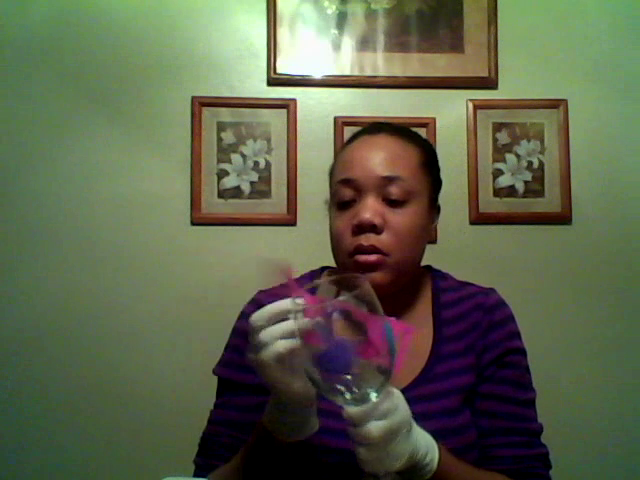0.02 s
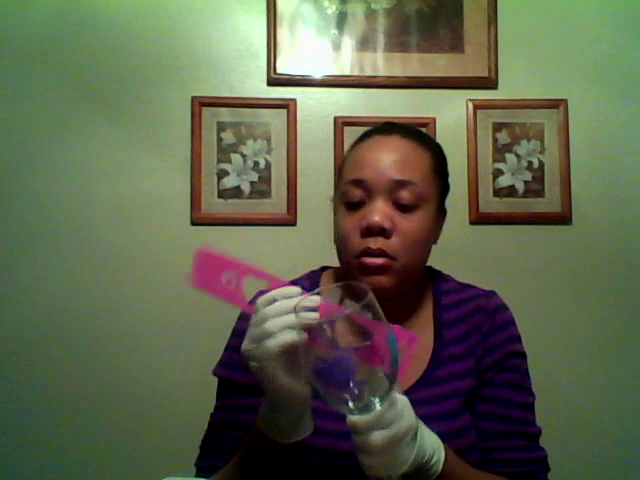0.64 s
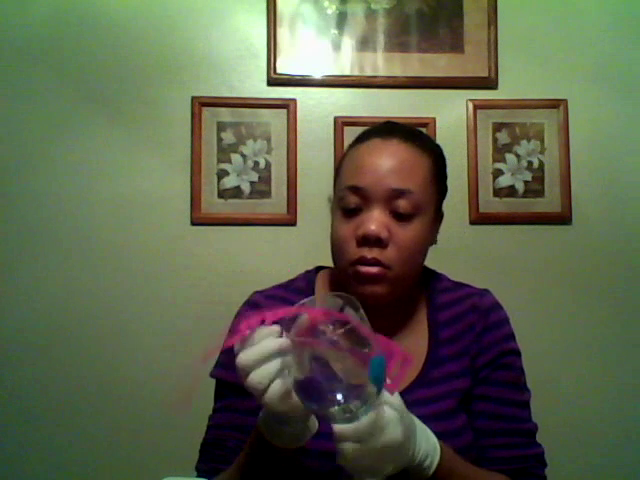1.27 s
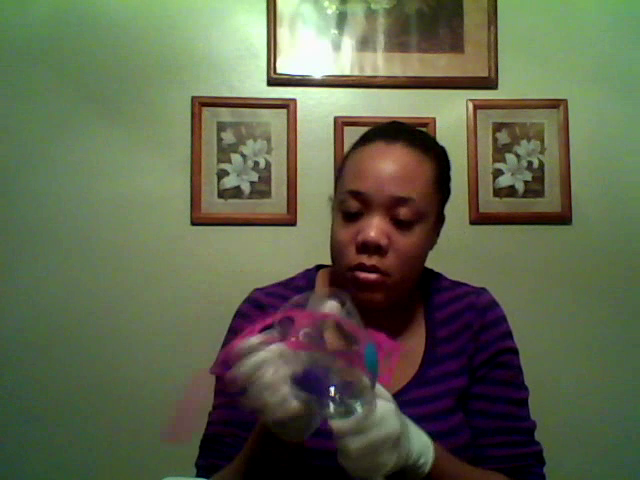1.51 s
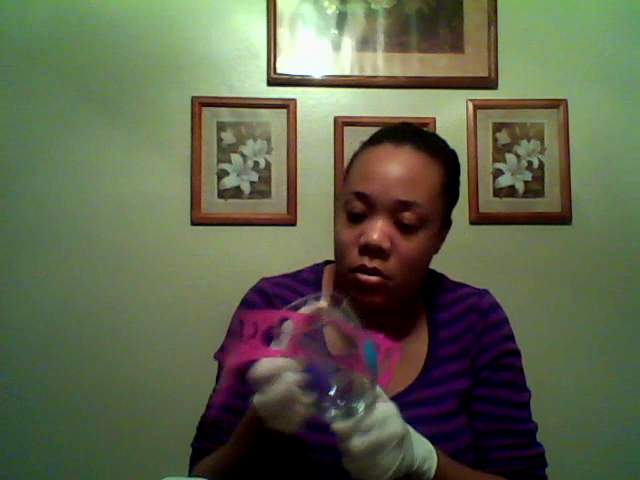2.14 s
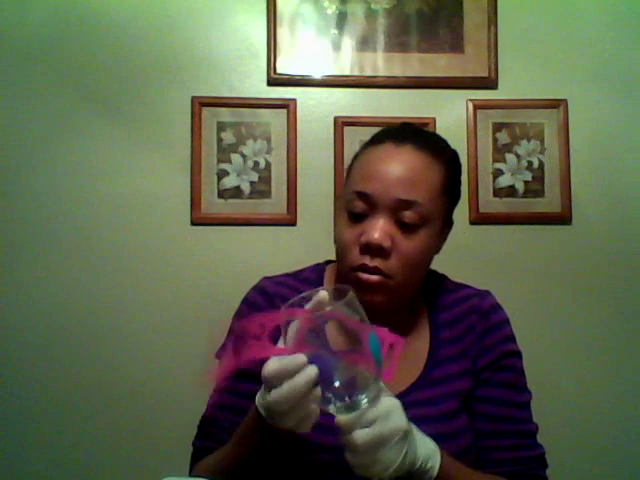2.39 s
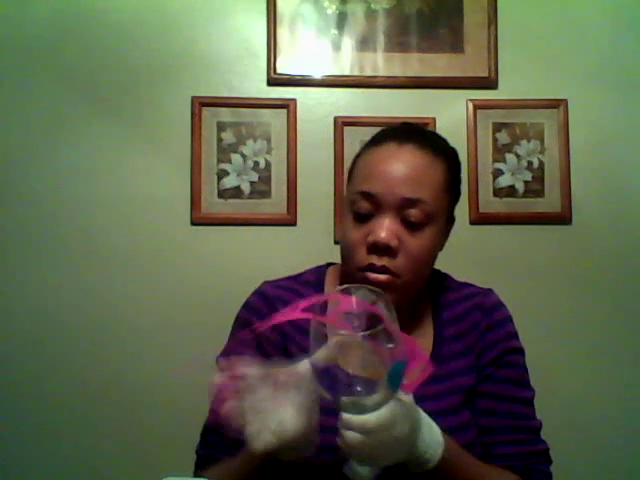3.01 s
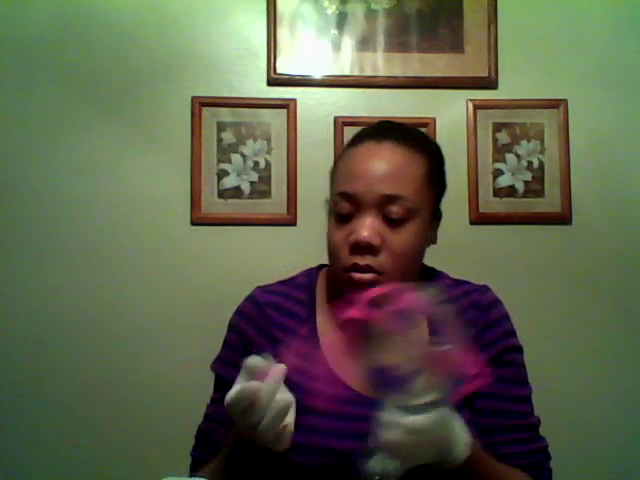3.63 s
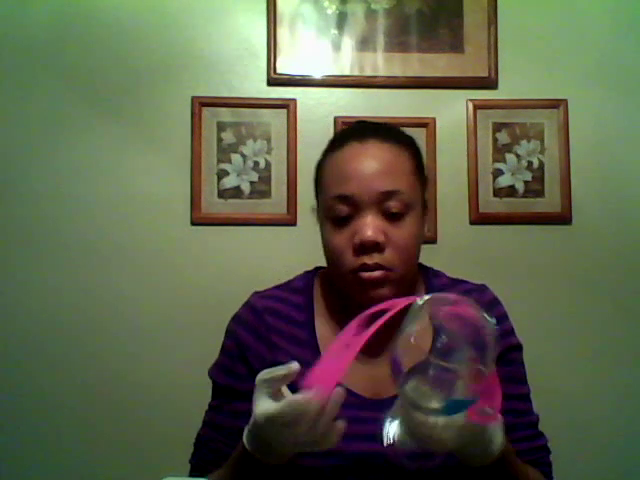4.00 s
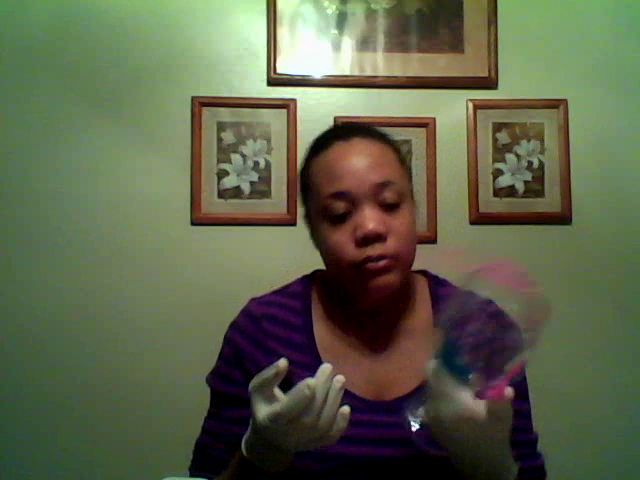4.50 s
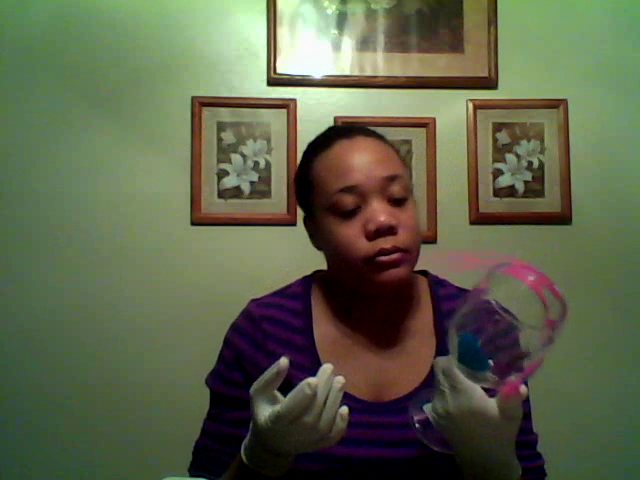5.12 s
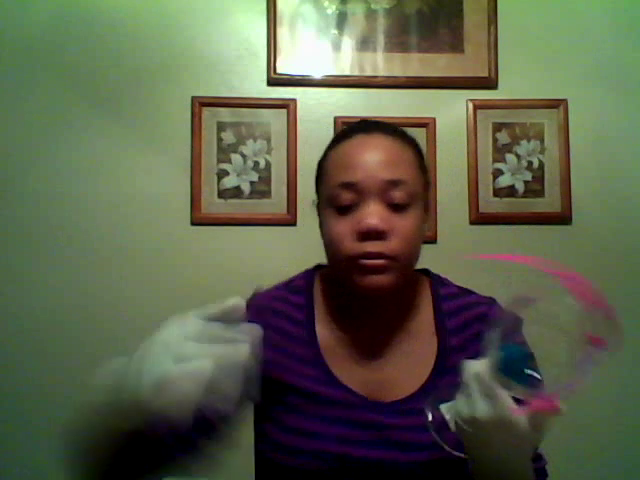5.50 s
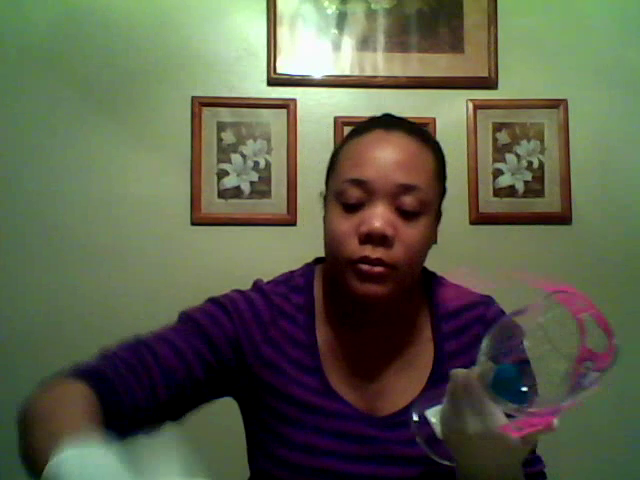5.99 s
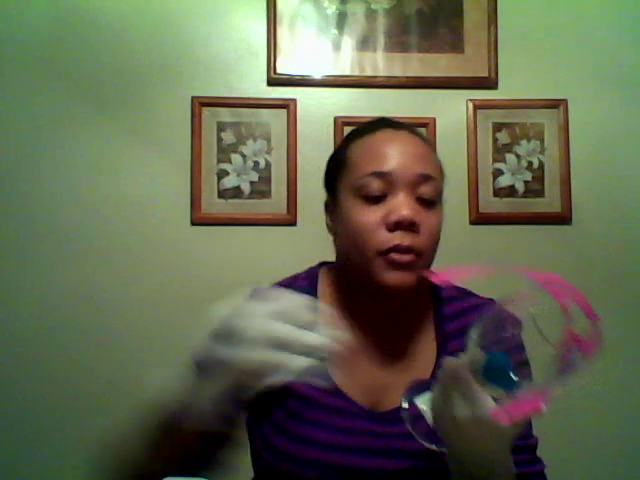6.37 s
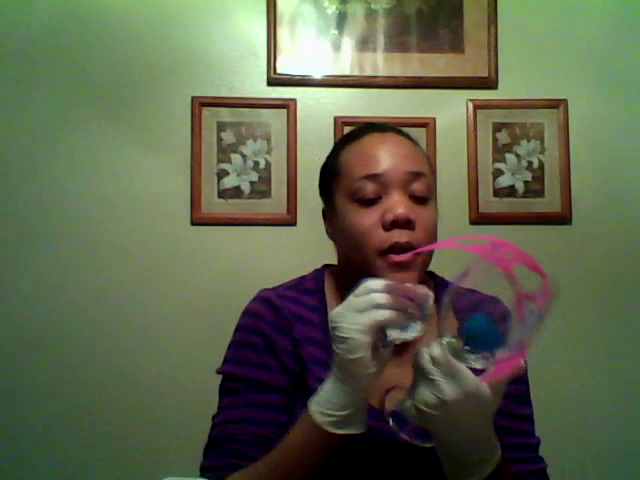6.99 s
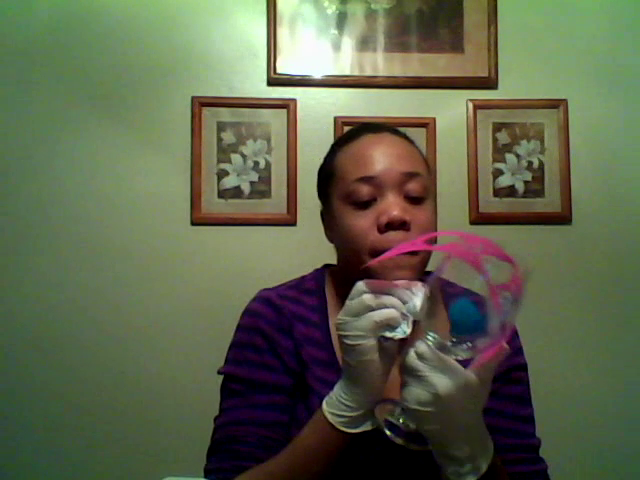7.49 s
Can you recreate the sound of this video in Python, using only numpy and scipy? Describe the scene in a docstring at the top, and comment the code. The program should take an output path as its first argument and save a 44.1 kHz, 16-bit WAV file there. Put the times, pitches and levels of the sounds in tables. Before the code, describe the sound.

Light plastic clicks and brief clinks on a handled wine glass, then a short scrape and squeak, over a low hum.

```python
"""Plastic sheet on a wine glass

Gloved hands turn a wine glass and press a thin plastic sheet onto it, close to a computer microphone.
The sheet snaps and scuffs against the bowl, which rings briefly under the grip; the gloves tick and the
hands bump. One hand slides something off the table and squeaks on it by stick-slip.
The computer's disk and fan hum in a small room."""
import sys
import numpy as np
from scipy import signal
from scipy.fft import rfft, irfft
from scipy.io import wavfile
from scipy.ndimage import uniform_filter1d

SR = 44100
rng = np.random.default_rng(int(sys.argv[2]) if len(sys.argv) > 2 else 0)


def master_out(mix):
    """Clip the mix to full scale and print it as 16-bit PCM to the path in sys.argv[1]."""
    frames = np.transpose(np.atleast_2d(mix))
    ceiling = np.clip(frames, -1, 1)
    pcm = np.round(ceiling * 32767).astype(np.int16)
    wavfile.write(sys.argv[1], SR, pcm)


N = 343539
TIME = np.arange(N) / SR
MS = 1e-3
# Edges in Hz of the four contact-noise bands: body, mid, edge, sheen.
CONTACT_EDGES_HZ = [300, 1400, 2800, 5000, 7600]


def undb(db):
    """Decibels to gain."""
    return 10 ** (np.asarray(db) / 20)


def unit(x):
    """Scale to unit energy."""
    return x / np.sqrt(np.sum(x ** 2))


def band(x, lo_hz, hi_hz, order=3):
    """Causal band-pass."""
    return signal.sosfilt(signal.butter(order, [lo_hz, hi_hz], "band", fs=SR, output="sos"), x)


def resonate(x, hz, width_hz):
    """Broad resonance, unity gain at centre."""
    return signal.lfilter(*signal.iirpeak(hz, hz / width_hz, fs=SR), x)


def add(out, start_s, x):
    """Mix x into out from start_s."""
    i = int(start_s * SR)
    out[i:i + len(x)] += x[:N - i]


def drift(rate_hz):
    """Smooth random drift, spread near one."""
    hold = int(SR / rate_hz)
    return uniform_filter1d(np.repeat(rng.standard_normal(N // hold + 1), hold), hold)[:N]


def room(x, early_db=-11, early_t60_s=0.079, late_db=-20, late_t60_s=0.29, gap_ms=4, path_spread=0.14):
    """Direct sound, near reflections and a short tail; paths differ per call, as the hands move."""
    # Table, screen and wall. Each row: delay in ms, gain in dB.
    reflections = [(2.3, -22.5), (6.1, -21.5), (9.2, -12), (11.4, -23.5)]
    t = TIME[:SR // 4]
    response = np.zeros(len(t))
    response[0] = 1
    for delay_ms, db in reflections:
        response[int(delay_ms * MS * SR * (1 + path_spread * rng.uniform(-1, 1)))] += undb(db)
    scatter, tail = rng.standard_normal((2, len(t))) * (t > gap_ms * MS)
    response += undb(early_db) * unit(scatter * np.exp(-np.log(1000) * t / early_t60_s))
    late = undb(late_db) * unit(tail * np.exp(-np.log(1000) * t / late_t60_s))
    response += band(late, 100, 3700, order=1)  # furnishings absorb treble
    return signal.fftconvolve(x, response)[:len(x)]


def computer_hum(disk_waver_db=0.47, fan_waver_db=2, fan_drift=.002):
    """Steady mains and disk tones, slightly wandering fan tones and a soft rush of air."""
    # Mains, disk spindle and fan. Each row: frequency in Hz, rms level in dB.
    tones = [(59.3, -69.5), (90.0, -53), (165.2, -84), (235.4, -74.5), (330.3, -73), (371, -89.5),
             (495.4, -85), (660.6, -75.5), (701.5, -82.5), (826, -83), (1156.4, -84)]
    # Fan air and room rumble. Each row: frequency in Hz, density in dB per Hz.
    air_spectrum = [(10, -91), (25, -77.5), (48, -85), (110, -89.5), (200, -94.5), (400, -99), (750, -95.5),
                    (1200, -103), (2400, -111), (4000, -115), (6500, -121), (7600, -129), (8600, -141)]
    out, fan_speed = np.zeros(N), 1 + fan_drift * drift(3)
    for hz, db in tones:
        is_fan = hz > 120
        clock_s = np.cumsum(fan_speed) / SR if is_fan else TIME
        waver_db = (fan_waver_db if is_fan else disk_waver_db) * drift(4.6)
        out += np.sqrt(2) * undb(db + waver_db) * np.sin(2 * np.pi * (hz * clock_s + rng.random()))
    air_hz, air_db = np.transpose(air_spectrum)
    bins_hz = np.maximum(np.fft.rfftfreq(N, 1 / SR), 1)
    colour = undb(np.interp(np.log(bins_hz), np.log(air_hz), air_db))
    return out + np.sqrt(SR / 2) * irfft(rfft(rng.standard_normal(N)) * colour, N)


def contact_levels(level_db, ping_hz, slope_db_oct, roll_off_db_oct=10.5):
    """Band levels in dB, sloped below the ping; a contact is too slow to excite much above it."""
    edges_hz = np.array(CONTACT_EDGES_HZ)
    octaves = np.log2(np.sqrt(edges_hz[:-1] * edges_hz[1:]) / ping_hz)
    return level_db + slope_db_oct * np.minimum(octaves, 0) - roll_off_db_oct * np.maximum(octaves, 0)


def sheet_response(force, levels_db, length_s, knock_hz, ping_hz, knock_db=10, ping_db=6):
    """The bent sheet rings at two pitches set by the grip; band levels are rms over length_s."""
    knock = undb(knock_db) * resonate(force, knock_hz, width_hz=260)
    ping = undb(ping_db) * resonate(force, ping_hz, width_hz=500)
    hollow = undb(0.5) * resonate(force, hz=566, width_hz=160)  # cavity between hand and bowl
    sound = room(force + knock + ping + hollow)
    bands = zip(CONTACT_EDGES_HZ, CONTACT_EDGES_HZ[1:], levels_db)
    return np.sqrt(length_s * SR) * sum(undb(db) * unit(band(sound, lo, hi)) for lo, hi, db in bands)


def sheet_snaps(rise_ms=.7, lead_in_db=-25, lead_in_ms=1.6, offset_s=.005, length_s=.02):
    """The sheet snaps against the glass; each snap has a faint, brief swell of noise before its crack."""
    # Each row: time in seconds, level at the ping in dB, ping in Hz, slope below it in dB per octave,
    # decay in ms, knock in Hz.
    snaps = [(0.037, -32, 7300, 3.5, 1.45, 2160), (.116, -49, 1970, 8, 1.1, 1800),
             (0.1373, -49, 2110, 4.5, 1.7, 1900), (0.3031, -41, 3880, 1, 2.2, 2140),
             (.3574, -58.5, 3470, -1, 1.06, 750), (0.6, -72, 5730, -2.5, 0.77, 680),
             (0.6889, -51.5, 6780, 11, 1.1, 1320), (.6955, -54.5, 5500, 6, 7.3, 1810),
             (0.7288, -64, 3640, 5, 1.3, 740), (1.392, -42, 6750, 26, 1.7, 730),
             (1.396, -49, 3300, 6, 1.5, 2500), (1.4081, -41.5, 6300, 3.5, 0.7, 1080),
             (1.456, -57.5, 2700, 1.5, 3.9, 754), (1.5565, -65, 2900, 4, 1.3, 1910),
             (1.5798, -37, 7100, 7.5, 1.1, 2290), (1.679, -42, 2300, 2.5, 4.6, 2010),
             (2.3027, -47, 3250, 7, 2.3, 1876), (2.5107, -49, 1750, 2.5, 1.9, 580),
             (2.8355, -45, 6700, 6, 0.65, 1100), (2.8405, -34, 6000, 12.5, 1.8, 1148),
             (3.2345, -61.5, 3240, 0, 2.6, 1320), (4.2629, -39.5, 5680, 6, 2.46, 1930),
             (5.4907, -46.5, 4130, 5.5, 1.04, 1340), (5.793, -44, 1000, 1.5, 2, 530),
             (5.8847, -46, 6200, 0.25, 0.62, 1100), (6.0048, -41, 6250, 2.5, 4.4, 1000),
             (6.1647, -51.5, 2000, 8, 3.7, 2120), (6.532, -62, 6500, 18, 0.56, 726)]
    out, t = np.zeros(N), TIME[:SR // 4] - offset_s
    after_s = np.maximum(t, 0)
    for start_s, level_db, ping_hz, slope_db_oct, decay_ms, knock_hz in snaps:
        levels_db = contact_levels(level_db, ping_hz, slope_db_oct)
        snap = (1 - np.exp(-after_s / (rise_ms * MS))) * np.exp(-after_s / (decay_ms * MS))
        lead_in = undb(lead_in_db) * np.exp(-abs(t) / (lead_in_ms * MS))
        force = (snap + lead_in + 1e-12) * rng.standard_normal(len(t))
        add(out, start_s - offset_s, sheet_response(force, levels_db, length_s, knock_hz, ping_hz))
    return out


def glass_ring(rise_s=0.0051):
    """The contact point favours some bowl modes; a close pair beats, and the grip shortens the ring."""
    # Each row: frequency in Hz, relative level in dB, free t60 in seconds.
    modes = [(763.5, -7, .31), (1847, -21, .75), (1855, -21, .75), (3463, -4, .32), (5324, -2, .27),
             (7300, -15.5, .12)]
    # Each row: start in seconds, level in dB, most excited frequency in Hz, fall either side in dB per
    # octave, share of t60 left by the grip.
    hits = [(.039, -37.5, 764, 12.5, 0.9), (.117, -62, 5324, 7, 1), (.305, -33, 3462, -2.5, 0.5),
            (.696, -43.5, 5324, 27, 0.32), (4.264, -43, 3480, 25, 0.42)]
    out, t = np.zeros(N), TIME[:SR]
    for start_s, hit_db, centre_hz, fall_db_oct, t60_share in hits:
        for hz, mode_db, t60_s in modes:
            gain = undb(hit_db + mode_db - fall_db_oct * abs(np.log2(hz / centre_hz)))
            envelope = (1 - np.exp(-t / rise_s)) * np.exp(-np.log(1000) * t / (t60_s * t60_share))
            add(out, start_s, gain * envelope * np.sin(2 * np.pi * hz * t))
    return out


def hand_bumps(knock_decay_s=0.0079, knock_length_s=.02, shudder_s=0.11):
    """The soft mass of a hand knocks dully on glass or table, and the table shudders after it."""
    # Each row: start in seconds, knock level in dB, shudder level in dB.
    bumps = [(.039, -48, -58), (.304, -51, -52), (1.409, -61, -84), (1.681, -51, -73), (2.512, -54, -73),
             (5.767, -57, -56.5), (5.795, -51.5, -57.5), (6.004, -51, -54), (6.165, -53.5, -65.5)]
    out, t = np.zeros(N), TIME[:SR // 3]
    for start_s, knock_db, shudder_db in bumps:
        push, sway = rng.standard_normal((2, len(t)))
        knock = unit(band(np.exp(-t / knock_decay_s) * push, 100, 480, order=2))
        shudder = unit(band(np.exp(-t / shudder_s) * sway, 22, 95, order=2))
        add(out, start_s, np.sqrt(knock_length_s * SR) * undb(knock_db) * knock)
        add(out, start_s, np.sqrt(shudder_s * SR) * undb(shudder_db) * shudder)
    return room(out)


def slip_grains(count, spread_db=4, grain_samples=16):
    """Tiny slips: noise in grains of unequal size."""
    noise, sizes = rng.standard_normal((count, 2)).T
    return noise * undb(spread_db * np.repeat(sizes[::grain_samples], grain_samples)[:count])


def scuffs(swell_ms=10.33, onset_db=-22, release_db=-20, lift_s=0.0091, knock_hz=1000):
    """Glove and plastic slide in dense stick-slip grains; the pressure swells and lets go."""
    # Each row: start in seconds, fade in ms, level at the ping in dB, ping in Hz, slope below it in dB
    # per octave.
    strokes = [(.046, 44, -54, 2450, -2.5), (.16, 310, -73.5, 2400, 5), (.304, 14, -41, 6340, 23),
               (.32, 12, -52, 5000, -0.5), (.732, 25, -66, 2500, 2), (1.362, 40, -46, 7010, 15.5),
               (1.408, 16, -53, 1830, 3), (2.471, 100, -72, 2500, 3), (2.823, 3.5, -57.5, 6960, -1.5),
               (3.212, 110, -75, 6000, 11), (5.667, 103, -48, 5620, 2.5), (5.693, 89, -40, 5640, 5),
               (5.759, 51, -50.5, 2080, 1.5), (5.98, 20, -47.5, 5060, 4), (6, 24, -51, 2900, -0.5),
               (6.127, 32, -57, 2100, 6.5), (6.154, 42, -62.5, 6400, 20), (6.19, 97, -75, 3400, -1),
               (6.29, 380, -80, 5000, 1)]
    out, t = np.zeros(N), TIME[:SR // 3]
    for start_s, fade_ms, level_db, ping_hz, slope_db_oct in strokes:
        levels_db = contact_levels(level_db, ping_hz, slope_db_oct)
        length_s = (swell_ms + fade_ms) * MS
        pressure = undb(np.interp(t, [0, swell_ms * MS, length_s], [onset_db, 0, release_db]))
        lift_off = np.exp(-np.maximum(t - length_s, 0) / lift_s) + 1e-12
        force = pressure * lift_off * slip_grains(len(t))
        # a sliding finger damps the ping
        scuff = sheet_response(force, levels_db, length_s, knock_hz, ping_hz, knock_db=6, ping_db=-12.5)
        add(out, start_s, scuff)
    return out


def glove_ticks(stray_db=-54, spread_db=3, accent_db=7, crackle_db=-3, crackle_ms=2.5):
    """Gloves tick as the fingers flex: a few distinct ticks among stray ones, each with a tiny crackle."""
    # Each row: time in seconds, stray ticks per second (none at or below zero).
    finger_activity = [(0, 22), (1, 7), (2.1, 16), (3.3, 11), (3.8, 0), (5.9, -3), (6.4, 8), (7.8, 2)]
    # Each row: time in seconds, relative level in dB.
    distinct_ticks = [(0.5132, -47), (0.7721, -43.5), (1.2526, -46), (1.4845, -35.5), (2.0268, -48),
                      (2.9517, -39.5), (6.6677, -46.5), (7.014, -47)]
    rate_hz = np.interp(TIME, *np.transpose(finger_activity))
    ticks = (rng.random(N) < rate_hz / SR) * undb(stray_db + spread_db * rng.standard_normal(N))
    for start_s, db in distinct_ticks:
        ticks[int(start_s * SR)] += undb(db + accent_db)
    t = TIME[:SR // 30]
    crackle = undb(crackle_db) * unit(np.exp(-t / (crackle_ms * MS)) * rng.standard_normal(len(t)))
    ticks += signal.fftconvolve(ticks, crackle)[:N]
    return room(band(ticks, 1500, 6600, order=4))


def glove_squeak(grip_waver_db=4.5, jitter=.05, rough_db=-2):
    """The glove sticks and slips almost regularly for a moment, under an uneven grip."""
    # Each row: time in seconds, slip rate in Hz, level in dB.
    contour = [(6.056, 730, -66), (6.061, 750, -44.5), (6.072, 795, -43.5), (6.08, 810, -44),
               (6.089, 785, -44.5), (6.096, 740, -51), (6.103, 720, -70)]
    # Each row: centre in Hz, width in Hz, gain in dB.
    resonances = [(790, 430, -8.5), (1650, 440, -11), (2180, 490, 1.5), (3150, 200, -11.5),
                  (5860, 590, -14), (6800, 270, -15)]
    times_s, slip_hz, level_db = np.transpose(contour)
    active = (TIME > times_s[0]) & (TIME < times_s[-1])
    out, t = np.zeros(N), TIME[active]
    rate_hz = np.interp(t, times_s, slip_hz) * (1 + jitter * drift(500)[active])
    cycles = np.cumsum(rate_hz) / SR
    slips = sum(np.cos(2 * np.pi * harmonic * cycles) for harmonic in range(1, 11))
    force = unit(slips) + undb(rough_db) * unit(rng.standard_normal(N)[active])
    # two passes deepen the valleys between resonances
    body = sum(undb(db) * resonate(resonate(force, hz, width), hz, width) for hz, width, db in resonances)
    envelope = undb(np.interp(t, times_s, level_db) + grip_waver_db * drift(230)[active])
    out[active] = envelope * body / np.std(body)
    return room(out)


def scene():
    """Handling noises over the computer's hum, mono."""
    mix = computer_hum() + sheet_snaps() + glass_ring() + scuffs() + glove_ticks() + hand_bumps()
    return (mix + glove_squeak())[None]


def record(dry, soften_hz=8100, cutoff_hz=8900):
    """The small microphone rounds off the upper treble and cuts everything above it."""
    soft = signal.sosfilt(signal.butter(6, soften_hz, fs=SR, output="sos"), dry)
    return signal.sosfilt(signal.ellip(10, .2, 70, cutoff_hz, fs=SR, output="sos"), soft)


dry = scene()
out = record(dry)
master_out(out)
```